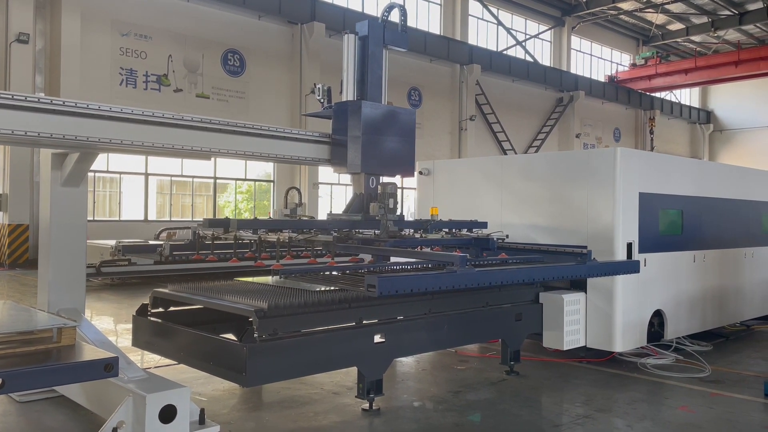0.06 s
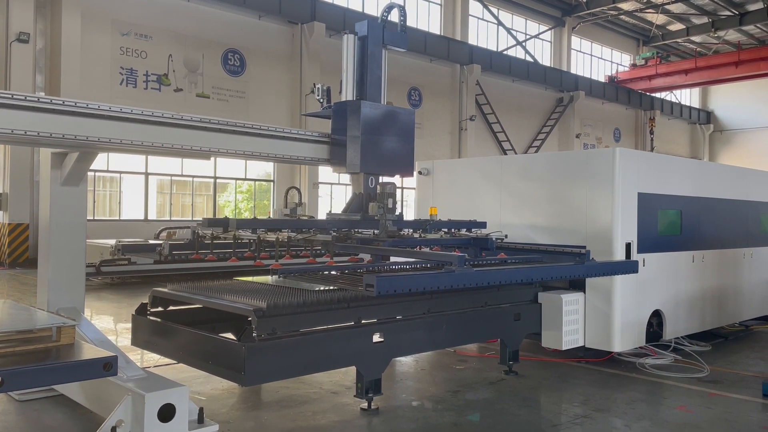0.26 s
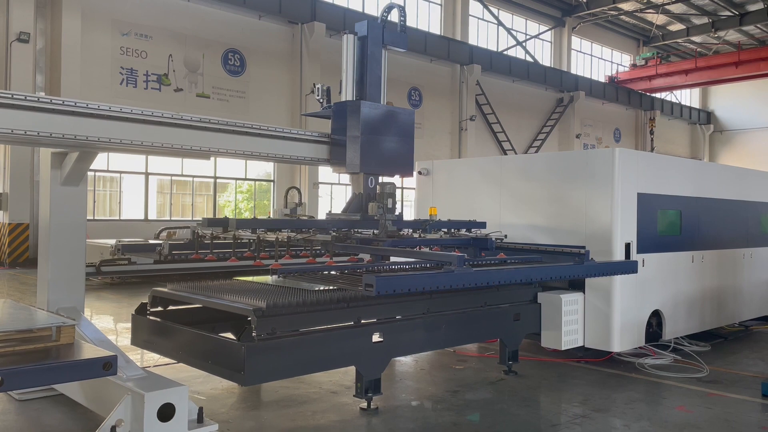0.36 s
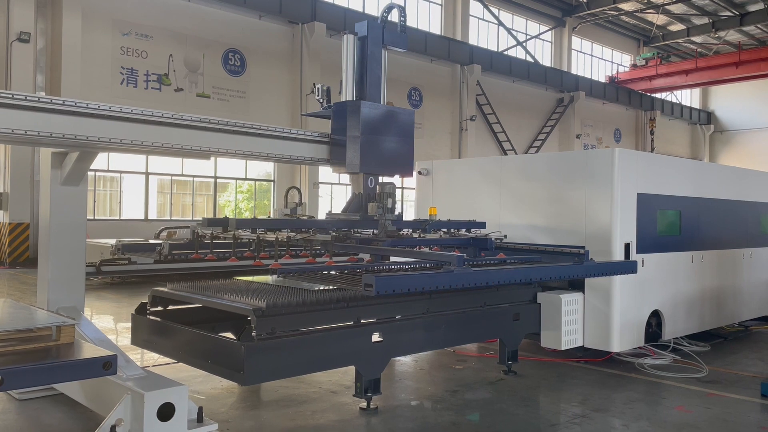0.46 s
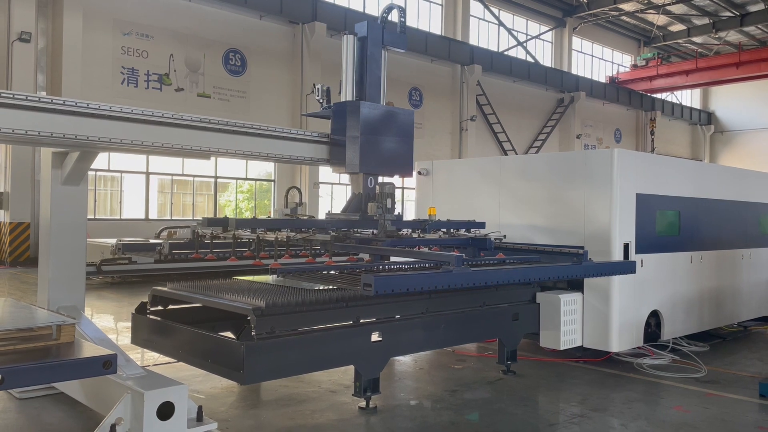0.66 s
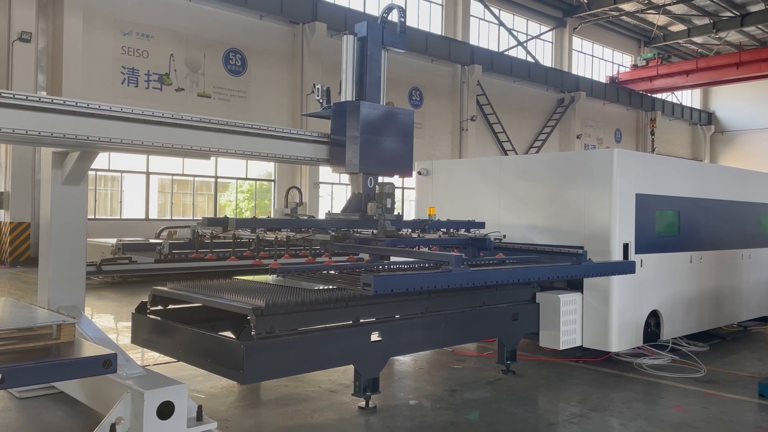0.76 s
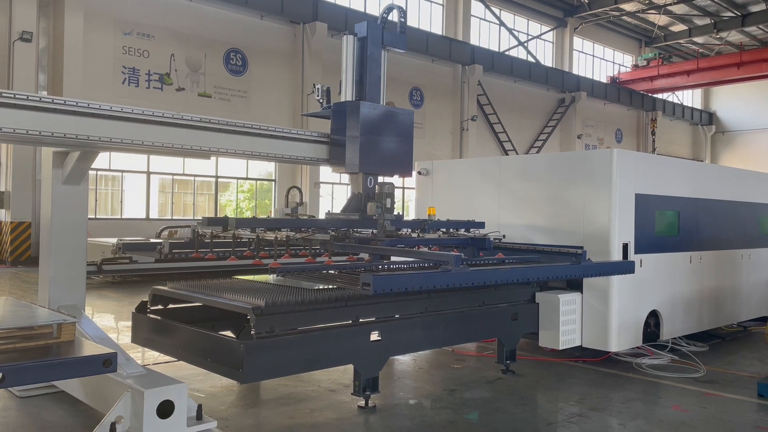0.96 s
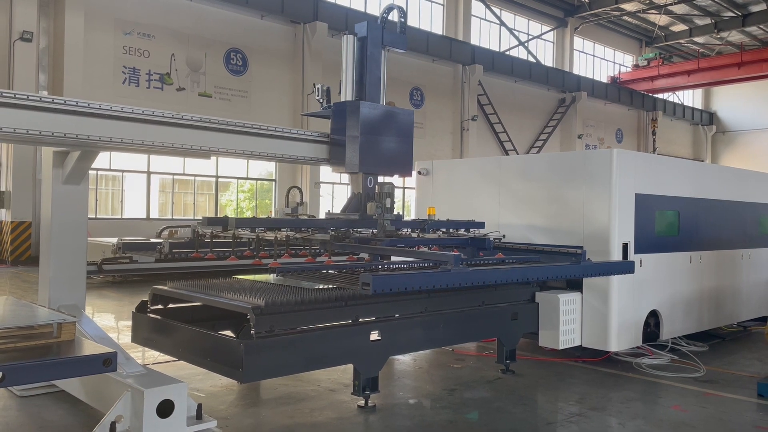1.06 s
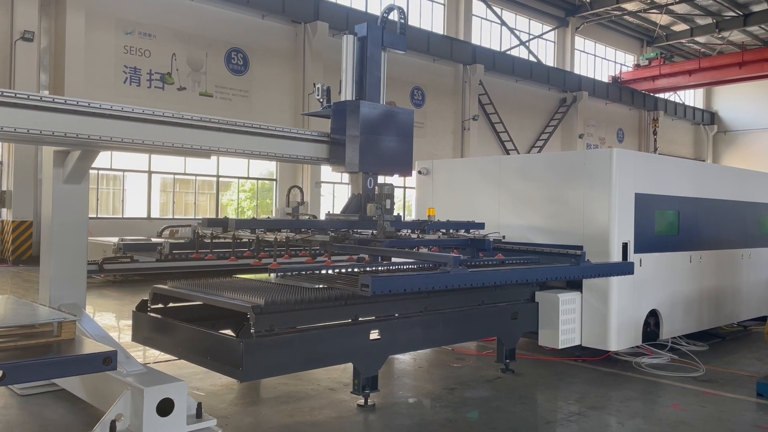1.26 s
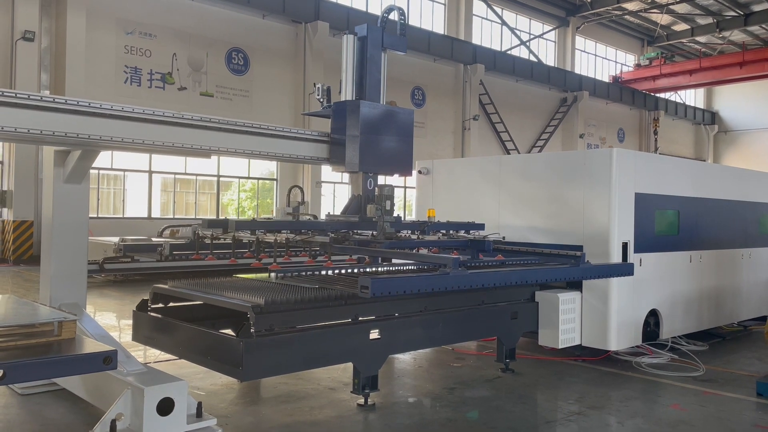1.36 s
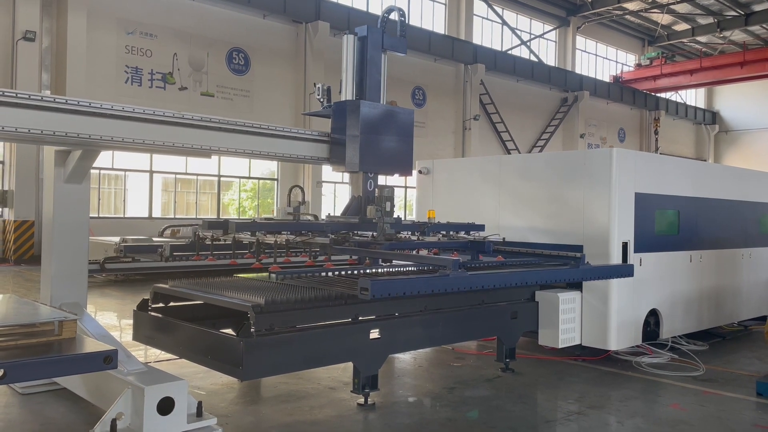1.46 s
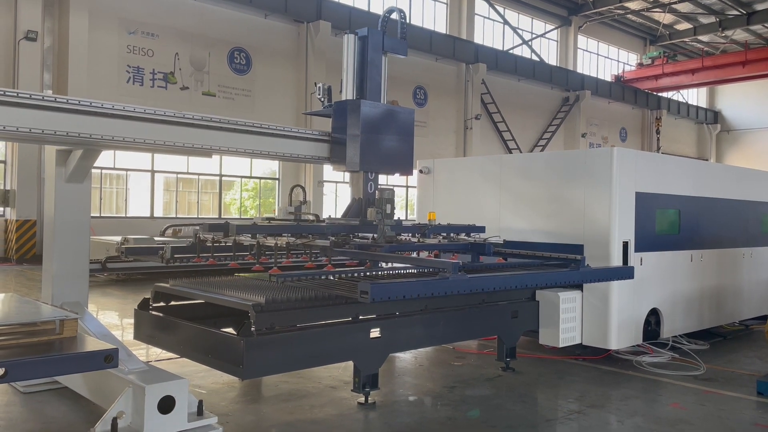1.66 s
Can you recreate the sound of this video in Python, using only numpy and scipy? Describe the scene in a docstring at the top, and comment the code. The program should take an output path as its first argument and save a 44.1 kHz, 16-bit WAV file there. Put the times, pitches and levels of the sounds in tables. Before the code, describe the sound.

A bright hiss of compressed air starts with a dull pop as a sheet loader moves. It ends in a quick cluster of heavy steel blows and a small ping, echoing in a factory hall over low machine hum.

```python
"""In a large factory hall, an air-powered sheet loader works over low machine noise.
A valve pops open and air hisses out, making the exhaust sing, while the moving frame rumbles
and knocks softly. The frame lands on its stops in a quick run of heavy blows: the steel booms,
a small part pings and the hall rings on."""
import sys
import numpy as np
from scipy import signal
from scipy.fft import rfft, irfft, next_fast_len
from scipy.io import wavfile

SR = 44100
rng = np.random.default_rng(int(sys.argv[2]) if len(sys.argv) > 2 else 0)


def put_to_file(sound):
    """Save the sound as 16-bit audio at rate SR, in the file named by the first command-line argument."""
    columns = np.atleast_2d(sound).T  # one column per channel
    safe = np.clip(columns, -1, 1)
    whole_steps = np.round(safe * 32767)
    wavfile.write(sys.argv[1], SR, whole_steps.astype(np.int16))


N = 74970
TIME = np.arange(N) / SR
VALVE_OPEN_S, VALVE_SHUT_S = 0.2205, 1.065
BASS_HZ = 420  # where the bass ends

# Blows on the frame. Each row: start in seconds, level in dB, dullness in dB (the ringing loses
# this much per octave above 1 kHz), extra bass in dB, hardness of the contact in dB.
blow_rows = None
BLOWS = [(0.522, -14, 8, -3, 0), (.718, -23.5, 7, 0, -9), (1.0159, -2.5, -1, -1.5, 2),
         (1.0215, -4, -1.5, 2.5, -3), (1.0337, 1, 2, 2.5, 5.5), (1.043, -7, -4.5, -17, -1),
         (1.0501, -10, 15, -7, 5), (1.087, -5, 15.5, 1, 16), (1.146, -8.5, -1.5, -25, -4)]


def from_db(db):
    """Turn decibels into a number to multiply by."""
    return 10 ** (np.asarray(db) / 20)


def rms_one(x):
    """Scale a sound so its average strength (rms) is 1."""
    return x / np.sqrt(np.mean(x ** 2) + 1e-20)


def at_hz(table, hz, column=1):
    """Read a table at any frequency, sliding between its rows on a pitch scale."""
    table = np.array(table)
    return np.interp(np.log(np.maximum(hz, 1)), np.log(table[:, 0]), table[:, column])


def since(start_s):
    """Seconds gone by since a moment, zero before it."""
    return np.maximum(TIME - start_s, 0)


def rise(start_s, attack_s):
    """A level that climbs from 0 to 1, faster when attack_s is small."""
    return 1 - np.exp(-since(start_s) / attack_s)


def fade(start_s, t60):
    """A level that jumps to 1, then drops 60 dB in t60 seconds (the fade time)."""
    return (TIME >= start_s) * np.exp(-np.log(1000) * since(start_s) / t60)


def ring(start_s, hz, t60):
    """One fading tone of a struck object."""
    return fade(start_s, t60) * np.sin(2 * np.pi * hz * since(start_s))


def noise(shape, ripple_db=4, ripple_spacing_hz=30.29):
    """Stereo noise whose strength follows shape(hz); reflections add fine peaks and dips."""
    # How alike left and right sound. Each row: frequency in Hz, likeness from 0 to 1.
    likeness = [(60, .97), (150, .98), (300, .9), (600, .72), (1200, .72), (3000, .74), (6000, .72),
                (8000, .96), (12000, .9), (15000, .7)]
    hz = np.fft.rfftfreq(N, 1 / SR)
    mid, side = rfft(rng.standard_normal((2, N)))
    bumps = rng.standard_normal(N // 10)
    ripple = np.interp(hz / ripple_spacing_hz, np.arange(len(bumps)), bumps) * hz / (hz + BASS_HZ)
    alike = np.clip(at_hz(likeness, hz), 0, .995)
    pair = np.sqrt(1 + alike) * mid + np.sqrt(1 - alike) * side * [[1], [-1]]
    return rms_one(irfft(shape(hz) * from_db(ripple_db * ripple) * pair, N))


def coloured(spectrum):
    """Noise that follows a table of frequencies and levels."""
    return noise(lambda hz: from_db(at_hz(spectrum, hz)))


def resonance(centre_hz, width_hz):
    """Noise gathered around one pitch, heard as a wavering tone."""
    return noise(lambda hz: 1 / (1 + ((hz - centre_hz) / width_hz) ** 2))


def band(low_hz, high_hz, order=6):
    """Noise between two frequencies; a higher order makes the edges sharper."""
    def shape(hz):
        low_cut = 1 + (low_hz / (hz + 1)) ** (2 * order)
        high_cut = 1 + (hz / high_hz) ** (2 * order)
        return 1 / np.sqrt(low_cut * high_cut)
    return noise(shape)


def ring_level(hz, t60, build_s):
    """Strength of the ringing at one frequency: the energy of all blows adds up and dies away."""
    octaves = max(np.log2(hz / 1000), 0)
    in_bass = 1 / (1 + (hz / BASS_HZ) ** 4)
    energy = 0
    for start, db, dull, bass, _ in BLOWS:
        strength = from_db(db - dull * octaves + bass * in_bass)
        energy += (strength * rise(start, build_s) * fade(start, t60)) ** 2
    return np.sqrt(energy)


def machines():
    """Machines in the hall rumble steadily and their motors give a wavering hum."""
    # The rumble. Each row: frequency in Hz, relative level in dB.
    rumble_spectrum = [(25, -37), (45, -4.5), (63, 2.5), (85, -7), (115, -8.5), (170, -9.5), (250, -14),
                       (500, -16.5), (1000, -23), (2000, -28), (4000, -28.5), (6500, -34), (9000, -47.5),
                       (15000, -52)]
    # The motors. Each row: pitch in Hz, level in dB.
    motor_tones = [(64.5, -57.5), (113.5, -46.5)]
    hum = sum(from_db(db) * resonance(hz, width_hz=5.1) for hz, db in motor_tones)
    return from_db(-39.5) * coloured(rumble_spectrum) + hum


def leak(swell_db_per_s=43):
    """Air seeps out in a thin hiss that grows until the valve opens."""
    level = from_db(-51 - swell_db_per_s * np.abs(VALVE_OPEN_S - TIME))
    return band(7000, 14900, order=2) * level * (TIME < VALVE_OPEN_S)


def travel(start_s=0.438):
    """The frame starts to move and rumbles softly along its guides."""
    return from_db(-40) * band(220, 770, order=3) * rise(start_s, 0.03) * fade(start_s, t60=5.5)


def valve(start_hz=626, end_hz=170, fall_s=0.0028):
    """The valve opens with a dull pop that drops in pitch, and the hall echoes briefly."""
    start = VALVE_OPEN_S
    cycles = end_hz * since(start) + (start_hz - end_hz) * fall_s * rise(start, fall_s)
    pop = from_db(-20) * np.sin(2 * np.pi * cycles) * fade(start, t60=0.035) * rise(start, 0.00085)
    echo = from_db(-37.5) * band(100, 320) * fade(start, t60=0.58) * rise(start, 0.0071)
    return pop + echo


def air(surge_s=0.31, shut_db_per_s=81):
    """A jet of air surges, settles and is shut off; it makes the exhaust sing and the hall echo."""
    # The hiss of the jet. Each row: frequency in Hz, relative level in dB.
    jet_spectrum = [(300, -4.5), (900, -2), (1500, -2.5), (2700, 1.5), (4500, 1), (6000, -0.5), (7500, -8),
                    (9000, -8), (11000, -5), (13000, -9), (15500, -7)]
    # Resonances of the exhaust. Each row: pitch in Hz, width in Hz, relative level in dB.
    exhaust_tones = [(1906, 17, -0.5), (2604, 6.9, 3.5), (2904, 44, 7.5), (3040, 28, 4.5), (3256, 15, 4.5),
                     (3730, 15, 1), (3818, 18, 5.5), (4170, 45, 4), (4514, 63, 11.5), (4670, 40, 4),
                     (5110, 6, 4), (5395, 68, 2.5), (5980, 10, -1)]
    surge = np.exp(-since(VALVE_OPEN_S) / surge_s)
    flow = from_db(2.5 * surge - shut_db_per_s * since(VALVE_SHUT_S))
    echo = from_db(-13.5) * fade(VALVE_SHUT_S, t60=2.8)
    hiss = coloured(jet_spectrum)
    treble = signal.sosfilt(signal.butter(1, 7000, "high", fs=SR, output="sos"), hiss)
    hiss += (from_db(2.5 * surge) - 1) * treble  # brighter during the surge
    hiss *= from_db(-33.5) * rise(VALVE_OPEN_S, 0.0035)
    singing = rms_one(sum(from_db(db) * resonance(hz, width) for hz, width, db in exhaust_tones))
    singing *= from_db(-38.5 + 4 * surge) * rise(VALVE_OPEN_S, 0.011)
    return np.hypot(flow, echo) * (hiss + singing)  # hypot adds the two as energies


def ping(start_s=1.147):
    """A small metal part rings briefly and lingers in the hall."""
    direct = from_db(-22) * fade(start_s, t60=0.03)
    echo = from_db(-42) * fade(start_s, t60=0.81)
    return resonance(6135, width_hz=140) * (direct + echo) * rise(start_s, 0.0026)


def wash(band_count=20):
    """Sheet and hall ring in a blur after each blow: low notes build up later and last longer."""
    # The blur of ringing. Each row: frequency in Hz, relative level in dB,
    # fade time in seconds, build-up time in seconds.
    wash_spectrum = [(50, -28, 2, .06), (96, -3, 1.76, 0.02), (163, 1, 1.68, .04), (378, 2, 1.38, 0.023),
                     (560, -7.5, 1.84, 0.0041), (833, 1, 0.81, 0.0017), (1510, -5.5, 0.85, 0.0013),
                     (2330, -6.5, 0.83, 0.0013), (4300, -17, 0.85, 0.0044), (5170, -28.5, 1.3, .004),
                     (8900, -34.5, 0.41, .004)]
    edges = np.geomspace(50, 10000, band_count + 1)
    centres = np.sqrt(edges[:-1] * edges[1:])
    gains = from_db(at_hz(wash_spectrum, centres)) * np.sqrt(np.diff(edges))  # wide bands hold more
    out = 0
    for low, high, hz, gain in zip(edges, edges[1:], centres, gains / np.linalg.norm(gains)):
        early = ring_level(hz, at_hz(wash_spectrum, hz, column=2), at_hz(wash_spectrum, hz, column=3))
        late = from_db(-15.5) * ring_level(hz, t60=3.02, build_s=0.092)  # the far ends of the hall
        out += gain * band(low, high, order=16) * np.hypot(early, late)
    return from_db(-20.5) * out


def frame():
    """Each blow shoves the air, cracks, thuds in the machine's bed and sets the steel frame ringing."""
    # Tones of the frame. Each row: pitch in Hz, relative level in dB, fade time in seconds.
    steel_tones = [(114, -11.5, 4.6), (178.2, 2.5, 2.24), (264.7, -10, 3.3), (304.5, -5, 1.7),
                   (310, 1, 1.48), (381, 1.5, 1.26), (451, 0.5, 1.24), (774, 12, 0.2), (922, 10, 0.23),
                   (993, 2, 0.48), (1029, 6, 0.41), (1308, 0, 0.5), (1733, 2, 0.26), (1828, -3.5, 0.51)]
    out = np.zeros((2, N))
    crunch = band(350, 4240, order=8)
    for start, db, dull, bass, hard in BLOWS:
        shove = from_db(-7.5) * ring(start, hz=620, t60=0.0062) * rise(start, 0.00062)
        crack = from_db(-17 - dull) * crunch * fade(start, t60=0.041) * rise(start, 0.0012)
        thud = from_db(-21 + bass) * ring(start, hz=316, t60=0.055) * rise(start, 0.0022)
        out += from_db(db) * (from_db(hard) * (shove + crack) + thud)
    for hz, db, t60 in steel_tones:
        tone = np.sin(2 * np.pi * (hz * TIME + rng.random()))
        out += from_db(-32 + db) * ring_level(hz, t60, build_s=2 / hz) * tone
    return out


def scene():
    """Everything that sounds in the hall, added together."""
    return valve() + air() + leak() + travel() + frame() + wash() + ping() + machines()


def record(dry, cutoff_hz=15000):
    """Two microphone openings hear different levels and timing; the highest treble is cut."""
    # Balance. Each row: frequency in Hz, left level minus right level in dB.
    balance_db = [(300, 0), (600, 1), (1200, 2.3), (2300, 3.5), (4200, 3.6), (7500, -1), (14000, 0)]
    # Timing. Each row: frequency in Hz, how far the left wave is ahead in radians.
    left_lead = [(1100, 0), (1600, -.5), (2400, -.1), (2900, .7), (4000, .2), (4600, .9), (5400, .6),
                 (7000, -1.2), (8050, -3.14), (11600, -6.3), (14500, -9.4)]
    size = next_fast_len(N + SR // 10)
    hz = np.fft.rfftfreq(size, 1 / SR)
    sides = np.array([[.5], [-.5]])  # left and right each take half
    openings = from_db(sides * at_hz(balance_db, hz)) * np.exp(1j * sides * at_hz(left_lead, hz))
    heard = irfft(rfft(dry, size) * openings, size)[:, :N]
    return signal.sosfilt(signal.cheby2(14, 70, cutoff_hz, fs=SR, output="sos"), heard)


dry = scene()
out = record(dry)
put_to_file(out)
```